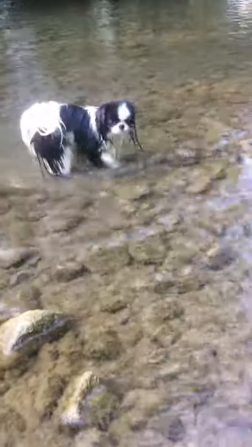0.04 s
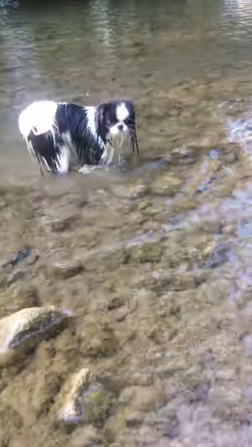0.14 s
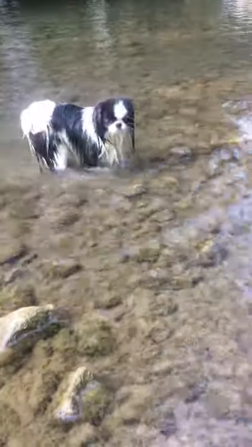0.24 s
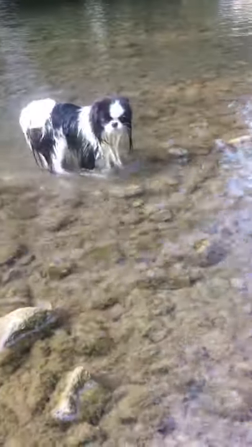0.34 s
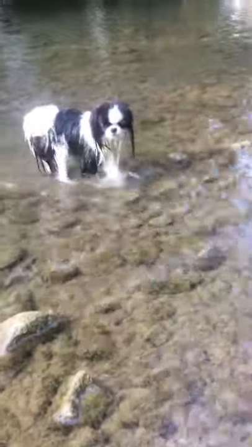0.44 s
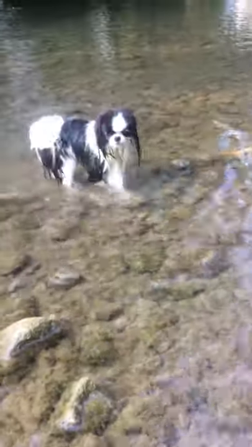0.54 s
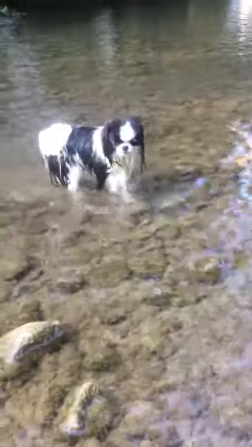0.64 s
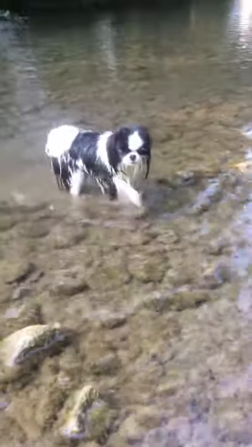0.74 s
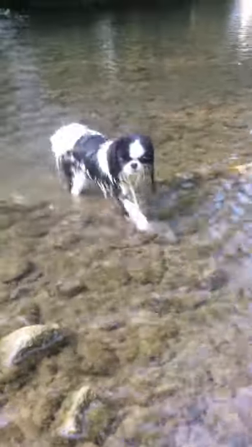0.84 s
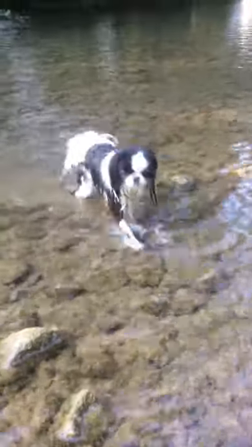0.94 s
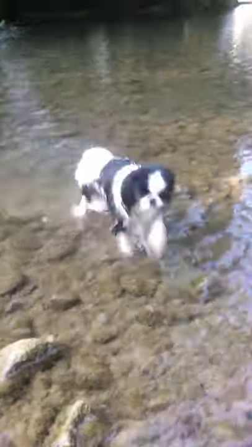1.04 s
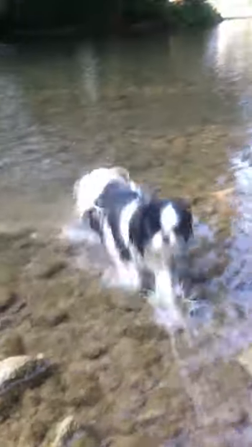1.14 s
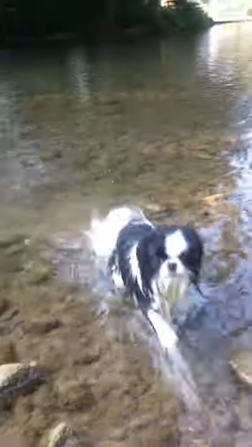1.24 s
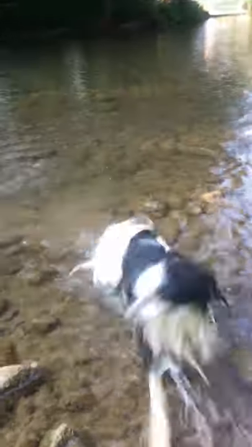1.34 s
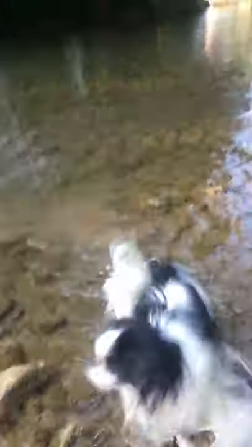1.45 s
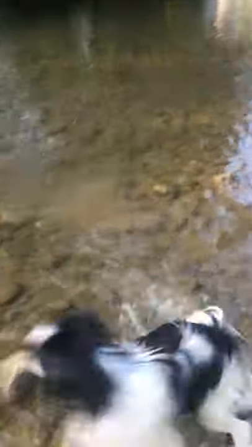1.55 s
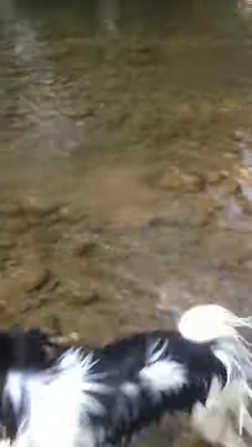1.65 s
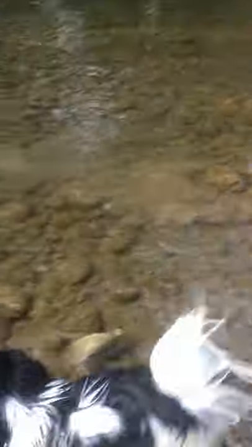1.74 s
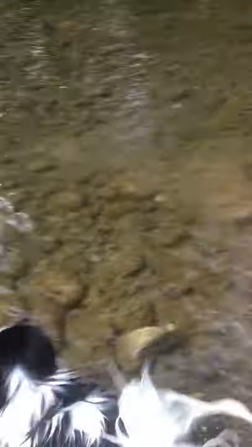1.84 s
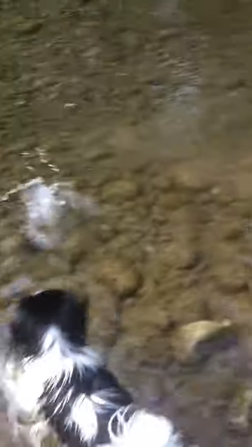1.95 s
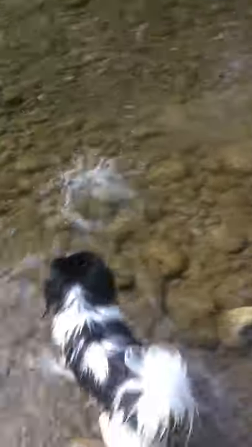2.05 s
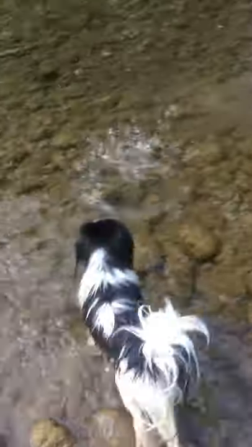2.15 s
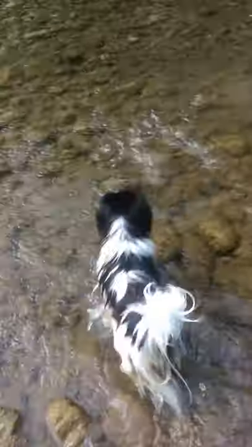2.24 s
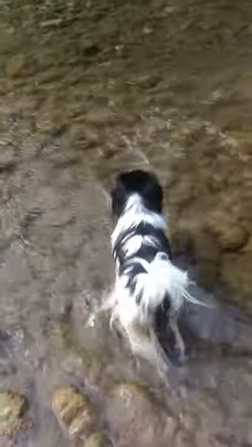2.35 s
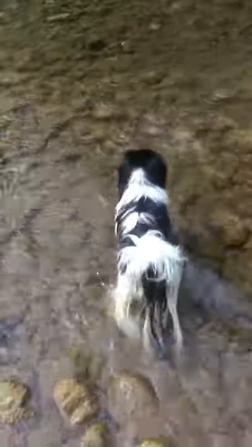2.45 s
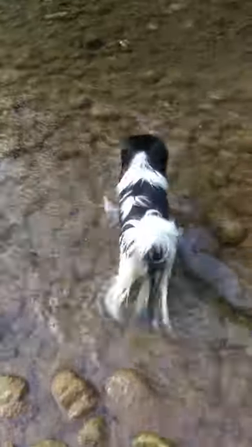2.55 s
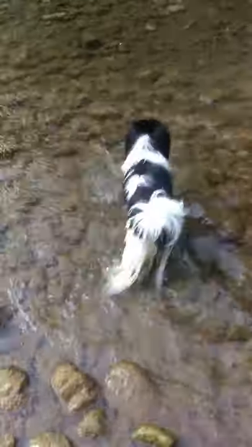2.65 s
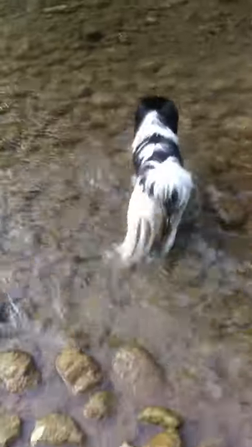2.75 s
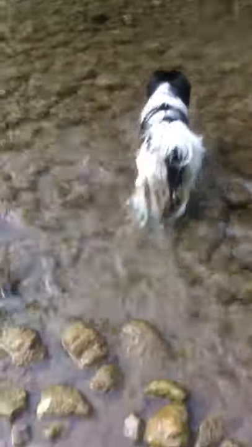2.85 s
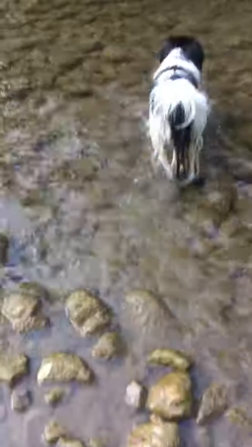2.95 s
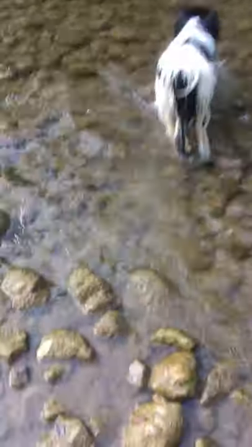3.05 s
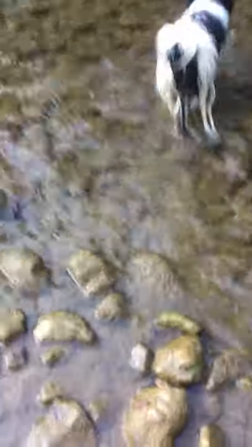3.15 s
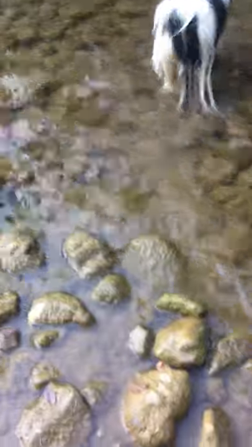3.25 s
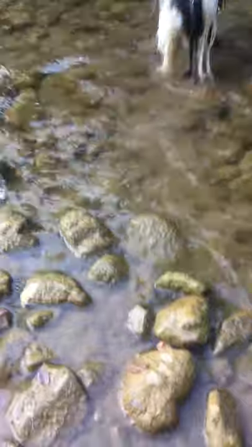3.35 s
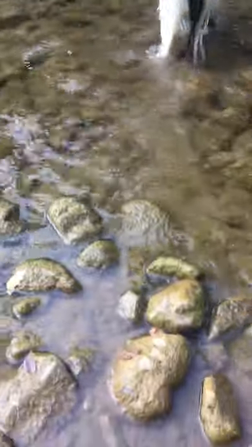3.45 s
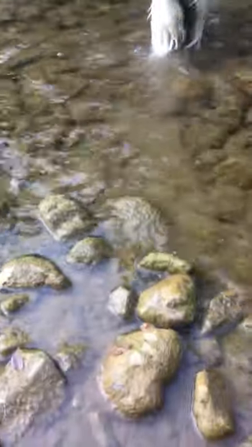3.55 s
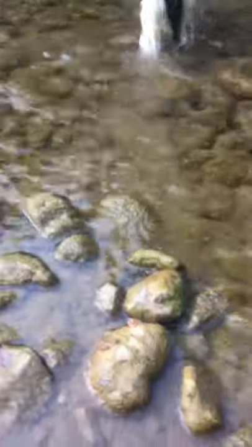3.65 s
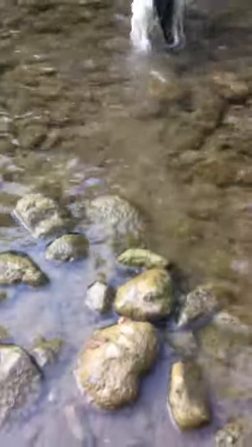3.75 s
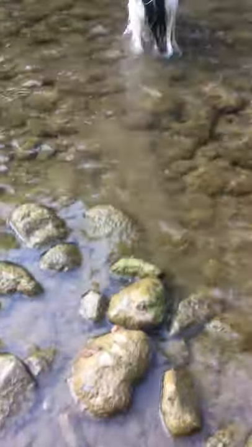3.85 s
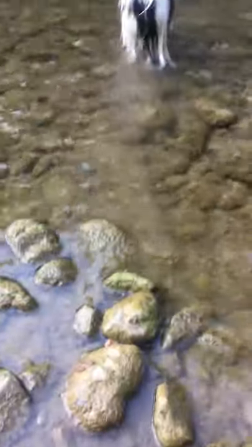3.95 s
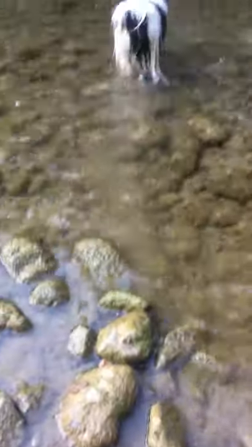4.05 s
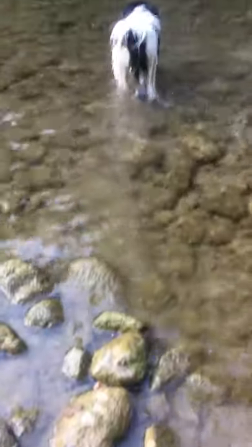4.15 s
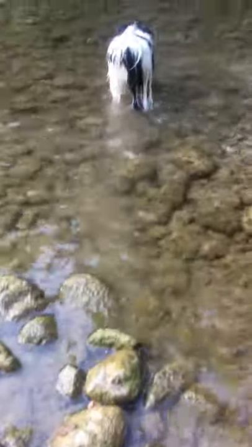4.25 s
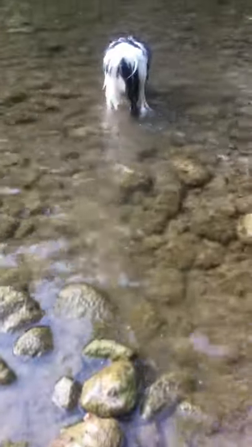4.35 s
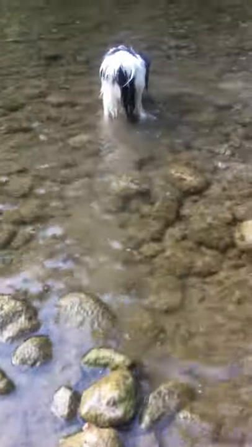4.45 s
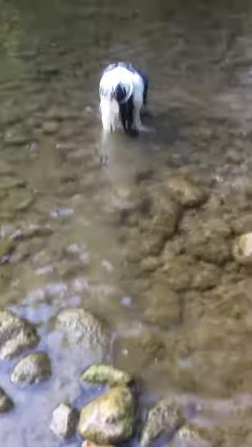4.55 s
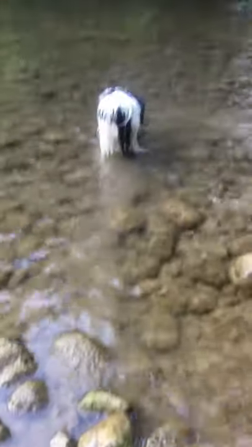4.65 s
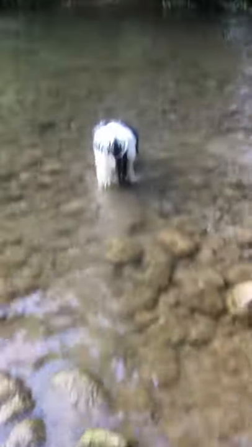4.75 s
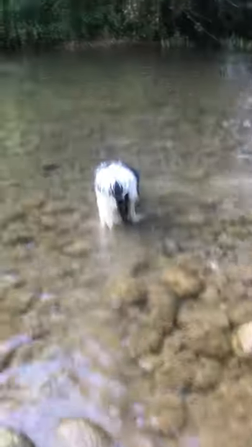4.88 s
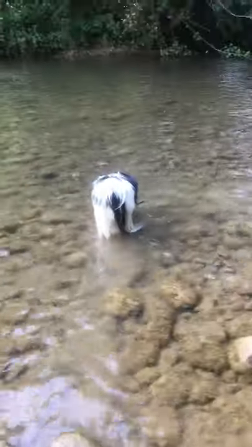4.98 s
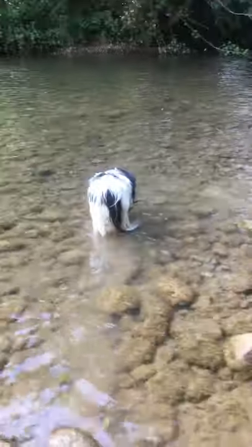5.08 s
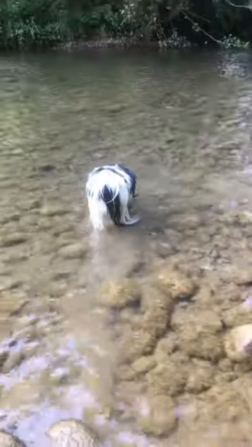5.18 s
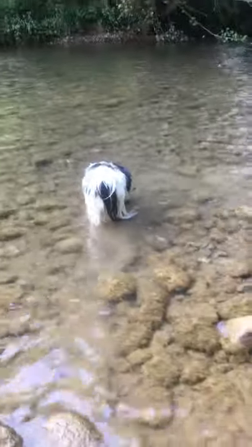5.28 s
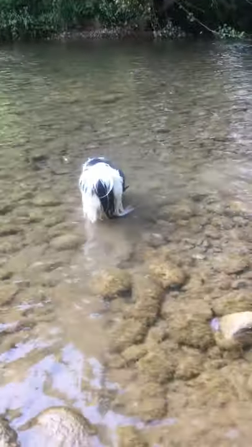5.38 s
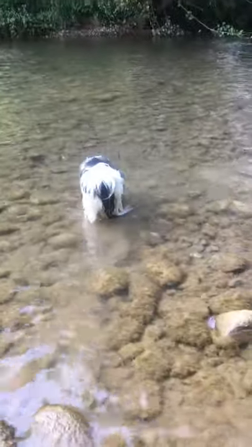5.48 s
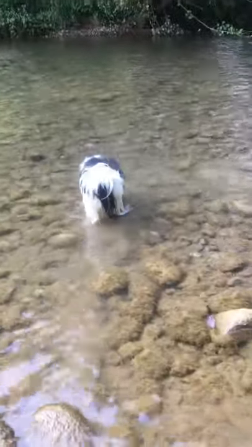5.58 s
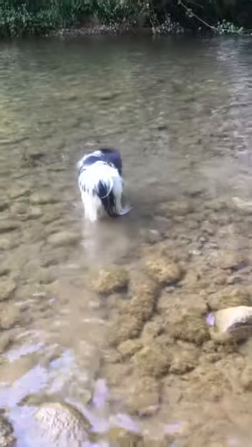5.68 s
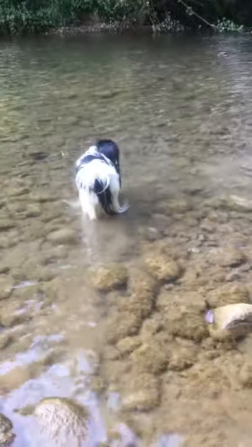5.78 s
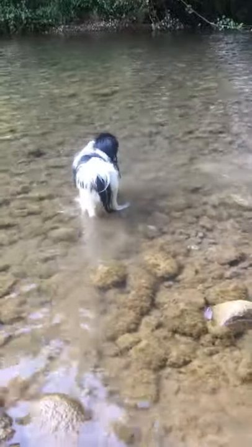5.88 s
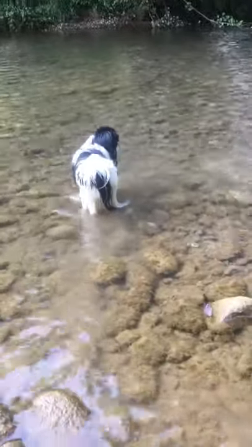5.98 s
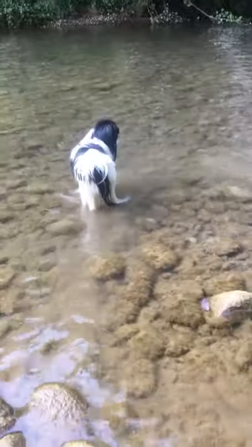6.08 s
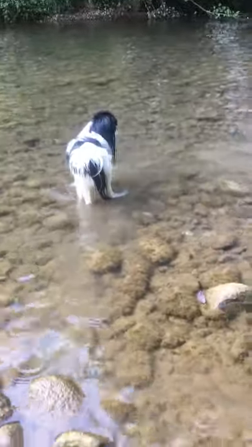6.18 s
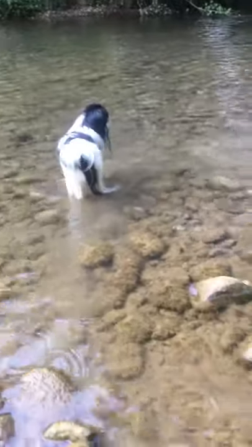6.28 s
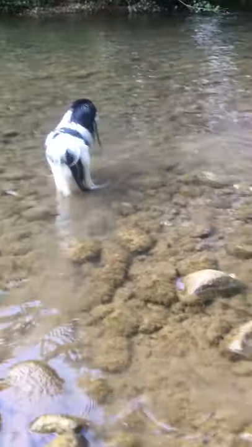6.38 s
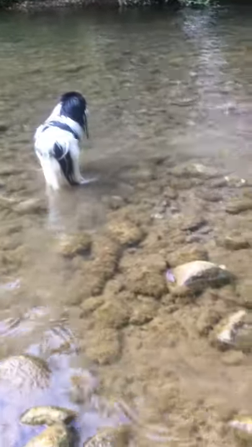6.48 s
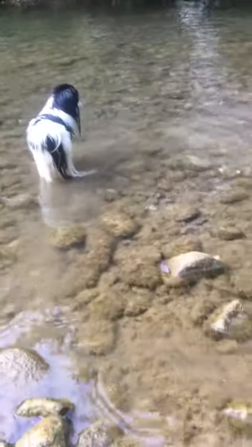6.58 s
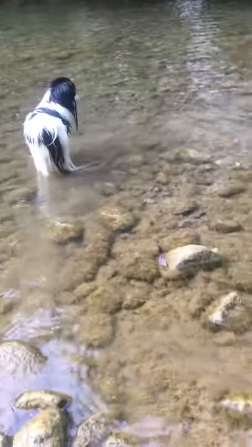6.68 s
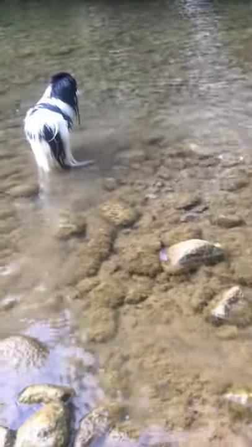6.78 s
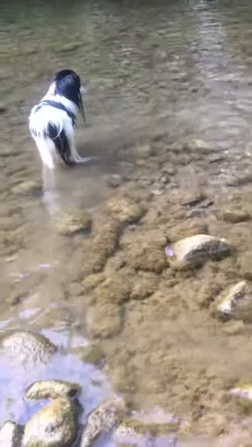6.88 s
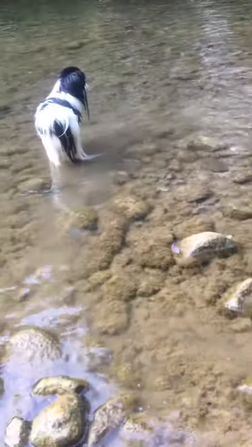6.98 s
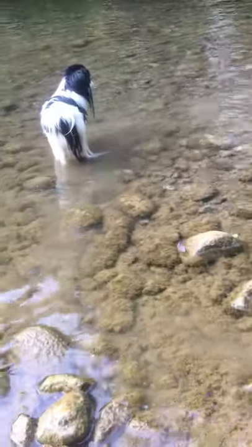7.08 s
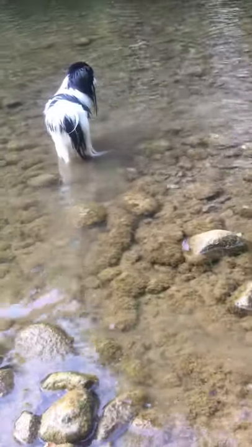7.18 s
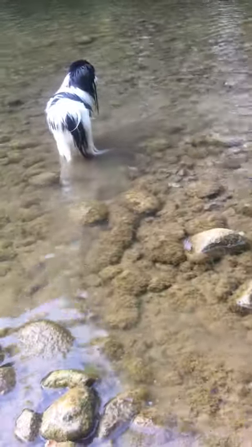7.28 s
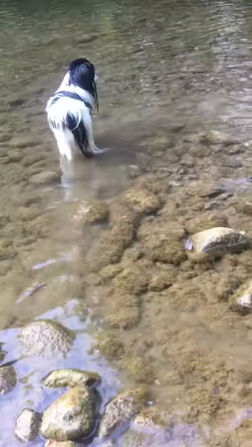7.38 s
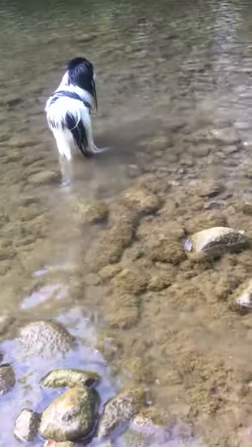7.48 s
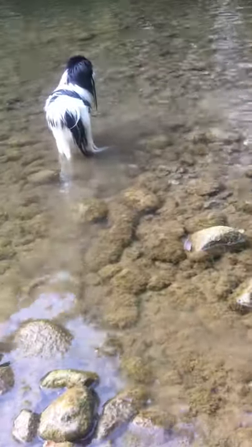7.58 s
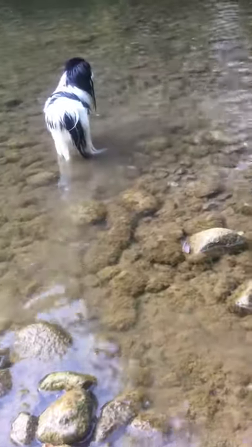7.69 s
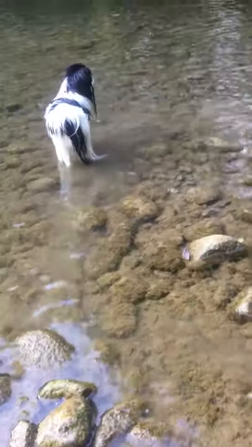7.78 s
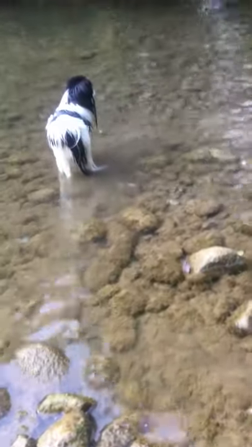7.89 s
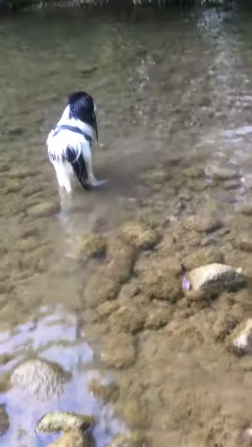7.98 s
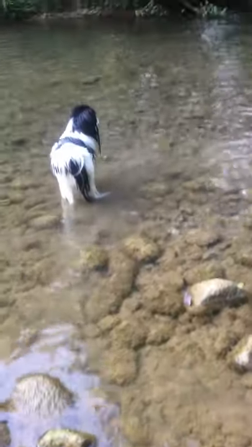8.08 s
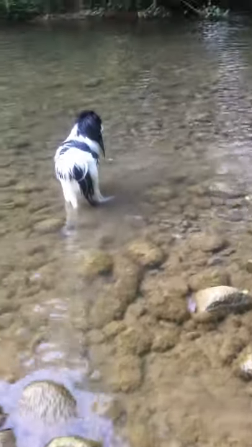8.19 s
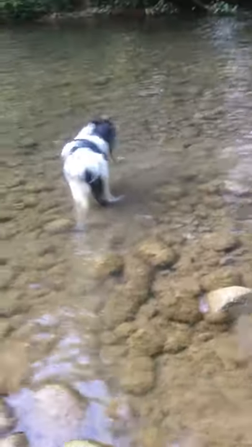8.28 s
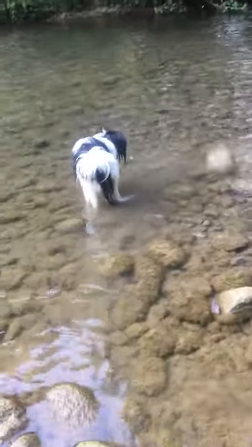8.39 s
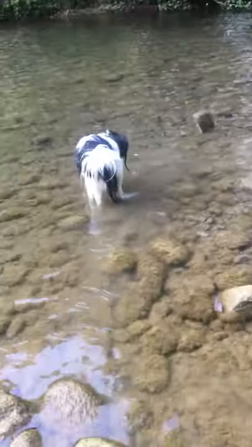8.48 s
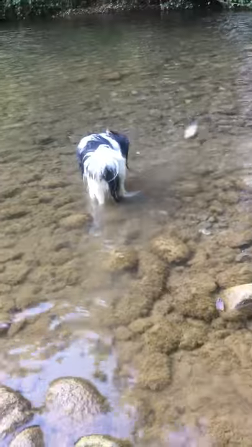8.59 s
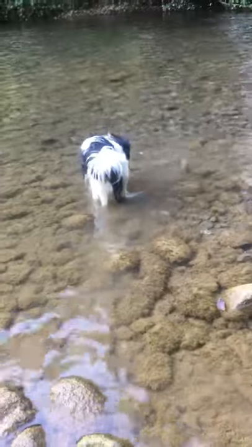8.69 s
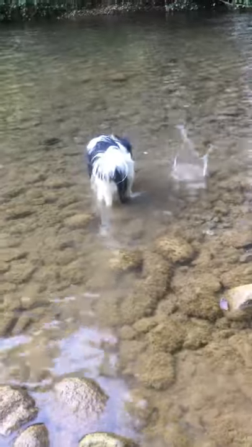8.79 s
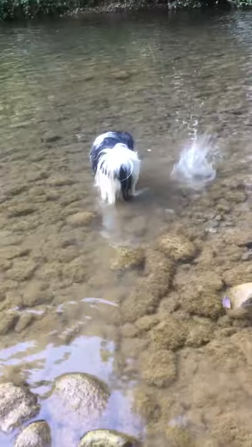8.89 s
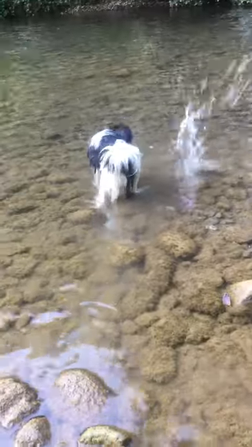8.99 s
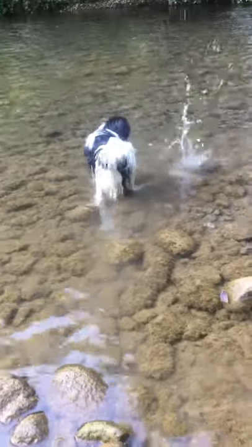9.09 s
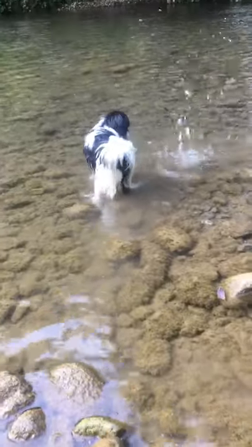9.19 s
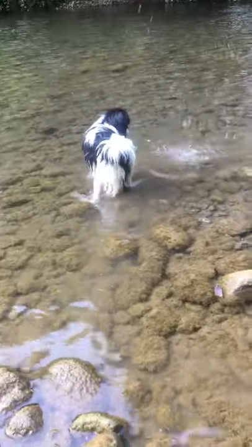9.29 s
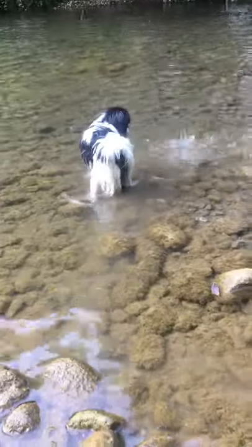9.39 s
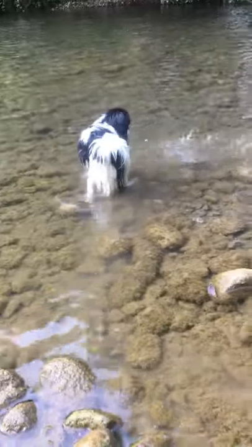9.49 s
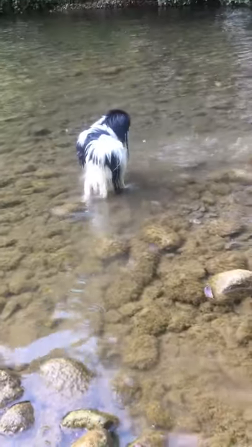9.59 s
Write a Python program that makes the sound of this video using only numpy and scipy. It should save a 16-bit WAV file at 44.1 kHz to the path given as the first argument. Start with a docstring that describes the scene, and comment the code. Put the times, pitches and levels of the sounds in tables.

```python
"""A small dog wades through a shallow stony river, and thrown stones plop into the water.
Paws and stones slap the surface, trap air that rings as bubbles, and throw spray that patters down.
Behind them the river murmurs, hisses and laps at the stones, something rumbles far off,
and a bird whistles among the trees on the bank."""
import sys
import numpy as np
from scipy import signal
from scipy.fft import rfft, irfft, next_fast_len
from scipy.io import wavfile
from scipy.ndimage import map_coordinates

SR = 44100
rng = np.random.default_rng(int(sys.argv[2]) if len(sys.argv) > 2 else 0)


def master_out(mix):
    """Clip the mix to full scale and print it as 16-bit PCM to the path in sys.argv[1]."""
    frames = np.transpose(np.atleast_2d(mix))
    ceiling = np.clip(frames, -1, 1)
    pcm = np.round(ceiling * 32767).astype(np.int16)
    wavfile.write(sys.argv[1], SR, pcm)


N = 424683
BURST_SAMPLES = 2048

# How loud the low background is: time_s, rumble_db, murmur_db
LOW_LEVELS = [(0, -59.5, -52.5), (.4, -53.5, -54.5), (1.2, -58, -54), (2.3, -55, -53.5),
              (3.1, -53.5, -53.5), (4.2, -58.5, -55.5), (5.2, -59.5, -55.5), (5.7, -54.5, -51),
              (6.4, -55.5, -53.5), (7.4, -54, -52.5), (7.75, -48.5, -51.5), (8.1, -53, -53),
              (8.7, -55.5, -53), (9.63, -54.5, -51.5)]
# How loud the flowing water is: time_s, hiss_db, lapping_db
FLOW_LEVELS = [(0, -57, -63), (1, -56, -60), (4, -57, -60), (4.5, -58, -66), (5.5, -58, -68),
               (5.72, -56, -55.5), (6.1, -57, -61), (6.95, -56, -62), (7.3, -57, -58), (7.6, -58, -65),
               (8.6, -57, -57), (8.75, -58, -64), (9.63, -57, -60)]


def amp(db):
    """Turn decibels into a gain."""
    return 10 ** (np.asarray(db) / 20)


def unit(x):
    """Scale x to an average (rms) level of 1."""
    return x / np.sqrt(np.mean(x ** 2) + 1e-20)


def curves(rows):
    """Join a table's points with lines: one curve for each column after the time."""
    time_s, *columns = np.transpose(rows)
    return [np.interp(np.arange(N) / SR, time_s, column) for column in columns]


def wobble(rate):
    """A smooth curve through `rate` random points a second."""
    return map_coordinates(rng.standard_normal(int(N * rate / SR) + 4), [np.arange(N) * rate / SR])


def filtered(x, response):
    """Filter x; response(hz) says how each frequency comes through."""
    size = next_fast_len(2 * len(x) if len(x) < SR else len(x) + 4096)
    return irfft(rfft(x, size) * response(np.fft.rfftfreq(size, 1 / SR)), size)[:len(x)]


def coloured(x, spectrum):
    """Shape the tone of x with (frequency_hz, level_db) points, then scale to level 1."""
    points_hz, db = np.transpose(spectrum)
    return unit(filtered(x, lambda hz: amp(np.interp(np.log(hz + 1), np.log(points_hz), db))))


def resonance(hz, centre_hz, width_hz):
    """A filter that passes its centre frequency and weakens those on either side."""
    return 1j * hz * width_hz / (centre_hz ** 2 - hz ** 2 + 1j * hz * width_hz + 1e-9)


def burst(db, fade_s, response):
    """A filtered puff of noise that peaks at db; the noise falls 60 dB in fade_s."""
    t = np.arange(BURST_SAMPLES) / SR
    noise = rng.standard_normal(BURST_SAMPLES)
    noise[2] += 4.5  # the first contact is a sharp push
    puff = filtered(noise * amp(-60 * t / fade_s), response)
    return amp(db) * puff / np.abs(puff).max()


def ringing(start_s, db, hz, life_s, rise, hold, size):
    """Bubbles ring higher as they near the surface: in life_s, 9 dB down and `rise` times the pitch."""
    t = np.arange(size) / SR
    db, hz, life_s, rise, hold = (np.reshape(x, (-1, 1)) for x in (db, hz, life_s, rise, hold))
    phase = 2 * np.pi * hz * (t + (rise - 1) * life_s / 2 * np.minimum(t / life_s, 4.5) ** 2)
    attack = 1 - np.exp(-t * hz * 1.5)
    fade = amp(db - 9 * (t / life_s) ** hold)  # hold 1 fades at once; 5 lingers, then stops
    positions = (start_s * SR).astype(int)[:, None] + np.arange(size)
    return np.bincount(positions.ravel(), (attack * fade * np.sin(phase)).ravel(), N + size)[:N]


def swarm(count, hz, spread, cycles, scatter_db, size):
    """A random crowd of small bubbles or drops, each `size` samples long."""
    start_s = rng.random(count) * N / SR
    pitch_dice, life_dice, level_dice = rng.standard_normal((count, 3)).T
    pitch_hz = np.clip(hz * np.exp(spread * pitch_dice), 100, SR / 2.6)
    life_s = np.minimum(cycles * np.exp(.4 * life_dice) / pitch_hz, size / SR / 3)
    db = scatter_db * np.clip(level_dice, -2, 2)
    return unit(ringing(start_s, db, pitch_hz, life_s, rise=1.1 + .08 * life_dice, hold=1.6, size=size))


def echo(x, fade_s, size):
    """Many reflections blur into a tail that falls 60 dB in fade_s."""
    tail = rng.standard_normal(size) * amp(-60 * np.arange(size) / SR / fade_s)
    return signal.fftconvolve(x, tail / np.linalg.norm(tail))[:N]


def far_rumble():
    """Deep noise from far off slowly swells and sinks."""
    # The rumble's tone: frequency_hz, level_db
    tone = [(20, -30), (33, -8), (45, 0), (62, 1), (85, -5), (130, -12), (180, -38), (310, -99)]
    level_db, _ = curves(LOW_LEVELS)
    return amp(level_db + .8 * wobble(3)) * coloured(rng.standard_normal(N), tone)


def river():
    """The river gives a hollow murmur and a fine hiss, and small waves lap at the stones."""
    # The tone of each of the three: frequency_hz, level_db
    murmur_tone = [(71, -30), (120, -5), (180, -4), (245, -5), (300, 1.5), (360, -4), (430, -8), (521, -10),
                   (620, -19), (910, -40), (1540, -120)]
    hiss_tone = [(300, -40), (650, -11), (1060, -9), (1400, -10), (1810, -11), (2430, -11), (2890, -18),
                 (4030, -19), (5940, -23), (7650, -28), (11000, -31), (15700, -33)]
    lapping_tone = [(330, -50), (520, -6), (670, 0), (800, -7), (1100, -12), (2000, -40), (6000, -120)]
    _, murmur_db = curves(LOW_LEVELS)
    hiss_db, lapping_db = curves(FLOW_LEVELS)
    murmur = amp(murmur_db + 1.2 * wobble(7)) * coloured(rng.standard_normal(N), murmur_tone)
    trickle = rng.standard_normal(N)
    trickle += .2 * swarm(count=500, hz=10000, spread=.22, cycles=2.5, scatter_db=4, size=80)
    waves = rng.standard_normal(N)
    waves += .1 * swarm(count=500, hz=800, spread=.35, cycles=5, scatter_db=3, size=800)
    hiss = amp(hiss_db + .7 * wobble(6)) * coloured(trickle, hiss_tone)
    lapping = amp(lapping_db + 1.8 * wobble(12)) * coloured(waves, lapping_tone)
    return murmur + hiss + lapping


def bird():
    """Short falling whistles, heard mostly as their echo among the trees."""
    # The notes: start_s, length_s, start_hz, end_hz, level_db
    notes = [(3.366, .012, 6950, 6250, -40), (4.41, .085, 7900, 6400, -63.5), (4.575, .05, 5700, 4950, -68),
             (4.615, .035, 4700, 4300, -64.5), (4.735, .055, 5300, 4650, -66.5),
             (4.775, .035, 4400, 4100, -68), (4.885, .04, 5300, 4800, -68), (4.925, .035, 4600, 4050, -66)]
    song = np.zeros(N)
    for start_s, length_s, start_hz, end_hz, db in notes:
        progress = np.linspace(0, 1, round(length_s * SR), endpoint=False)
        pitch_hz = end_hz + (start_hz - end_hz) * (1 - progress) ** 1.6
        note = np.sin(2 * np.pi * np.cumsum(pitch_hz) / SR) * np.sin(np.pi * progress ** 1.5)
        song[round(start_s * SR):][:len(note)] += amp(db) * note
    return amp(-3) * song + amp(6.5) * echo(song, fade_s=.85, size=SR)


def soft_hisses():
    """Brief swells of hiss in evenly spaced frequency bands."""
    # The swells: start_s, peak_s, end_s, level_db
    swells = [(.07, .15, .23, -51), (6.91, 6.94, 6.99, -58), (8.24, 8.27, 8.32, -64)]
    # The bands: centre_hz, width_hz, level_db
    bands = [(2600, 700, -6), (5600, 700, 0), (8700, 700, 2), (12000, 1200, -2), (14800, 1200, -2)]
    t = np.arange(N) / SR
    gain = sum(amp(db) * np.interp(t, times_s, [0, 1, 0]) for *times_s, db in swells)
    tone = lambda f: sum((-1) ** k * amp(db) * resonance(f, hz, width_hz)
                         for k, (hz, width_hz, db) in enumerate(bands))
    return gain * unit(filtered(rng.standard_normal(N), tone))


def spurt():
    """A smooth hiss starts suddenly and fades, its treble first."""
    # The spurt's tone: frequency_hz, level_db
    tone = [(900, -40), (2000, -6), (3000, -3), (4500, -4), (5600, -4), (6400, 1.5), (7300, -4),
            (10000, -9), (15600, -14)]
    start_s, level_db, fall_s = 3.3675, -36, .16
    t = np.arange(N) / SR - start_s
    hiss = coloured(rng.standard_normal(N), tone)
    treble = filtered(hiss, lambda hz: 1 / (1 + (8000 / (hz + 1)) ** 6))
    fade = lambda seconds: (t > 0) * amp(level_db - 20 * np.abs(t) / seconds)
    return fade(fall_s) * (hiss - treble) + fade(fall_s / 2.2) * treble


def stirring():
    """The gains of gurgle and spray: sloshes jump up and die away on top of steady stirring."""
    # How hard the dog and the ripples stir the water: time_s, level_db
    steady = [(0, -72), (.2, -60), (.35, -68), (.82, -68), (.88, -55), (1.08, -47), (1.3, -41), (1.75, -39),
              (2.2, -47), (2.45, -52), (2.7, -47), (2.85, -53), (3.05, -48), (3.2, -58), (3.7, -58.5),
              (4.15, -64), (4.4, -85), (8.7, -85), (8.9, -53), (9.15, -60), (9.63, -64)]
    # Thrown water: start_s, gurgle_db, spray_db, fall_s (for the gurgle to drop 20 dB)
    sloshes = [(.24, -52, -59, .08), (.29, -46, -58, .06), (.505, -52, -58, .1), (.533, -48, -53, .2),
               (.582, -49, -48, .12), (1.085, -39, -42, .07), (1.115, -43, -58, .25), (1.21, -36, -36, .4),
               (1.33, -41, -39, .1), (1.36, -37, -38, .17), (1.458, -38, -36, .25), (1.53, -37, -35, .15),
               (1.585, -34, -32, .3), (1.8, -36, -38, .08), (1.9, -40, -39, .35), (1.975, -41, -40, .1),
               (2.012, -41, -40, .07), (2.072, -40, -40, .35), (2.238, -40, -37, .22),
               (2.432, -41, -47, .04), (2.458, -45, -47, .1), (2.527, -39, -47, .11),
               (2.675, -45, -48, .22), (2.912, -45, -51, .45), (3.128, -42, -54, .05),
               (3.32, -44, -56, .15), (3.368, -42, -50, .2), (3.418, -39, -50, .2), (3.75, -50, -61, .15),
               (3.874, -43, -57, .1), (3.945, -46, -60, .13), (5.47, -60, -47, .06),
               (5.573, -41, -33, .045), (5.64, -60, -63, 1.2), (8.803, -54, -53, .15),
               (8.846, -44, -41, .035), (8.918, -46, -52, .05), (8.935, -39, -36, .045),
               (8.985, -45, -57, .08), (9.045, -50, -54, .05), (9.245, -51, -59, .25),
               (9.342, -51, -56, .05)]
    start_s, gurgle_db, spray_db, fall_s = np.transpose(sloshes)[:, :, None]
    t = np.arange(0, N / SR + .002, .001)
    steady_db = np.interp(t, *np.transpose(steady))
    age_s, rise_s = t - start_s, .008

    def gain(base_db, peak_db, fade_s):
        shape_db = -20 * np.where(age_s < 0, -age_s / rise_s, np.abs(age_s / fade_s) ** 1.4)
        power = amp(2 * base_db) + amp(2 * (peak_db + shape_db)).sum(axis=0)
        return np.interp(np.arange(N) / SR, t, np.sqrt(power))

    return gain(steady_db, gurgle_db, fall_s), gain(steady_db - 5.5, spray_db, .75 * fall_s)


def churn():
    """Stirred water gurgles with small bubbles and throws drops; both come in the same clumps."""
    # The tone of each: frequency_hz, level_db
    gurgle_tone = [(120, -60), (260, -20), (450, -16), (650, -5), (1160, -1), (1400, -4), (2180, -3),
                   (2900, -6), (4000, -10), (6000, -32), (9900, -120)]
    spray_tone = [(2060, -32), (3500, -2), (3940, 0), (5060, -5), (5460, -2), (7840, -6), (9340, -4),
                  (10300, -8), (12000, -4), (15600, -10)]
    gurgle_gain, spray_gain = stirring()
    clumps = wobble(45)
    bubbles = 1.15 * rng.standard_normal(N)
    bubbles += swarm(count=7500, hz=2100, spread=.6, cycles=8, scatter_db=4.2, size=500)
    drops = 1.1 * rng.standard_normal(N)
    drops += swarm(count=11000, hz=9500, spread=.55, cycles=4.5, scatter_db=4.6, size=110)
    gurgle = unit(amp(1.5 * clumps) * coloured(bubbles, gurgle_tone))
    spray = unit(amp(1.2 * clumps + 2.8 * wobble(40)) * coloured(drops, spray_tone))
    return amp(-.7) * gurgle_gain * gurgle + amp(1.3) * spray_gain * spray


def drips():
    """Single drops hit the surface, each with a tiny tick around its own pitch."""
    # The drops: start_s, peak_db, pitch_hz
    drops = [(0.2079, -41, 5580), (0.2783, -34, 4700), (0.4364, -39, 8930), (0.5536, -35, 5740),
             (0.5876, -25, 4680), (0.8724, -36, 5990), (0.8999, -32, 5670), (0.9443, -39, 9400),
             (1.0785, -30, 12500), (1.1005, -26, 10500), (1.78, -20, 9500), (1.846, -17, 8500),
             (2.693, -31, 8200), (2.701, -32, 3600), (2.754, -31, 6100), (2.785, -36, 6000),
             (2.891, -36, 7500), (2.915, -33, 3300), (2.937, -31, 4800), (2.985, -34, 6000),
             (3.2329, -33, 12200), (3.254, -39, 5120), (3.8048, -33, 5180), (3.69, -38, 11500),
             (3.888, -35, 12200), (4.2896, -39, 11900), (4.3326, -44, 13300), (5.3433, -33, 10900),
             (5.4021, -39, 5950), (5.6094, -39, 3600), (5.6745, -42, 5900), (5.696, -39, 7000),
             (5.9973, -41, 8790), (6.0252, -42, 4530), (6.94, -35, 5930), (8.979, -37, 7290),
             (9.0124, -36, 7170), (9.0274, -35, 5400), (9.201, -38, 6490), (9.2474, -34, 6910),
             (9.3561, -33, 5880), (9.433, -30, 6390)]
    out = np.zeros(N + BURST_SAMPLES)
    for start_s, db, hz in drops:
        tone = lambda f: resonance(f, hz, .4 * hz) * resonance(f, 1.1 * hz, 1.5 * hz)
        out[round(start_s * SR):][:BURST_SAMPLES] += burst(db, .015, tone)
    return out[:N]


def trapped_air():
    """Pockets of air ring under water, and their level flutters as the surface moves."""
    # Bubbles that stay near one pitch: start_s, level_db, pitch_hz, life_s
    bubbles = [(.012, -30, 300, .011), (.033, -29, 180, .01), (.292, -32, 950, .01),
               (.532, -31, 1300, .005), (.582, -33, 320, .008), (.598, -34, 3200, .004),
               (.617, -36, 2800, .005), (1.083, -29, 1240, .006), (1.089, -30, 700, .014),
               (1.05, -36, 650, .012), (1.0, -36, 1400, .006), (.958, -38, 1050, .006),
               (1.27, -31, 1050, .008), (1.328, -28, 2100, .005), (1.347, -29, 670, .009),
               (1.382, -28, 1150, .012), (1.432, -33, 1150, .007), (1.207, -26, 2490, .008),
               (1.382, -28, 1580, .014), (1.534, -26, 1280, .005), (1.582, -23, 1090, .014),
               (1.587, -17, 930, .006), (1.607, -19, 810, .009), (1.642, -27, 1590, .009),
               (1.698, -27, 1450, .005), (1.804, -20, 1180, .012), (1.841, -20, 1710, .005),
               (1.843, -28, 670, .015), (1.991, -24, 1060, .006), (2.088, -25, 2440, .005),
               (2.09, -30, 1750, .006), (2.24, -21, 1020, .009), (2.273, -21, 810, .005),
               (2.534, -25, 780, .007), (2.593, -35, 1010, .008), (2.612, -37, 1030, .02),
               (2.648, -33, 1100, .005), (2.886, -38, 2040, .01), (2.924, -30, 1140, .005),
               (2.972, -36, 960, .012), (3.012, -32, 1580, .004), (3.186, -37, 960, .004),
               (2.786, -34, 920, .017), (3.125, -37, 640, .016), (3.145, -33, 360, .012),
               (3.068, -34, 640, .004), (3.069, -31, 180, .006), (3.126, -25, 1130, .003),
               (3.138, -19, 1030, .007), (3.37, -28, 2450, .005), (3.327, -33, 1750, .008),
               (3.414, -27, 850, .017), (3.49, -27, 620, .005), (3.53, -33, 1750, .007),
               (3.466, -26, 1070, .013), (3.877, -37, 550, .02), (3.877, -33, 1150, .005),
               (3.895, -36, 1000, .012), (3.932, -37, 1300, .008), (3.893, -29, 1910, .004),
               (3.948, -33, 1250, .003), (3.914, -24, 1400, .005), (3.964, -26, 2450, .004),
               (4.238, -30, 1360, .009), (4.238, -29, 1000, .006), (5.567, -19, 680, .005),
               (5.607, -38, 1750, .004), (5.855, -46, 950, .006), (6.915, -41, 1600, .008),
               (7.548, -45, 850, .003), (8.846, -18, 1450, .004), (8.847, -21, 3700, .003),
               (8.855, -39, 2550, .012), (8.92, -33, 3500, .004), (8.929, -33, 4400, .003),
               (8.847, -19, 640, .006), (8.897, -32, 1660, .004), (8.921, -35, 640, .008),
               (8.936, -19, 700, .005), (8.937, -18, 1250, .004), (8.988, -32, 1330, .005),
               (9.05, -36, 2450, .007), (9.268, -38, 900, .008), (9.29, -36, 1250, .006),
               (9.313, -34, 2900, .005), (9.345, -36, 2850, .006), (9.357, -37, 1200, .005)]
    # Gulps that sweep up as they surface: start_s, level_db, pitch_hz, life_s, rise, hold
    gulps = [(.241, -34, 1050, .005, 1.47, 1.6), (.63, -40, 480, .05, 2.2, 5),
             (1.098, -23, 1040, .007, 1.4, 1.6), (2.489, -38, 430, .024, 2.5, 6),
             (2.535, -32, 340, .025, 2.2, 6), (2.727, -26, 950, .007, 1.35, 1.3),
             (3.318, -33, 720, .016, 1.47, 1.8), (3.508, -34, 620, .028, 3.1, 4),
             (3.735, -42, 720, .045, 1.47, 1.8), (3.984, -36, 1600, .013, 1.2, 1.6),
             (9.04, -45, 420, .025, 1.5, 2.2), (9.436, -38, 2500, .005, 1.47, 1.6)]
    rings = ringing(*np.transpose(bubbles), rise=1.04, hold=1.4, size=4000)
    sweeps = ringing(*np.transpose(gulps), size=4000)
    return amp(3 * wobble(160)) * (rings + sweeps)


def plunks():
    """The deep hollow left by a stone or paw rings low and dies away smoothly."""
    # The hollows: start_s, level_db, pitch_hz, life_s
    hollows = [(.251, -33, 320, .006), (2.458, -15.5, 215, .024), (2.805, -25, 280, .006),
               (3.625, -27, 370, .005), (5.568, -19.5, 205, .016), (8.939, -21, 200, .011)]
    return ringing(*np.transpose(hollows), rise=1.1, hold=1, size=6000)


def slaps():
    """A paw or stone smacks the surface: a short burst with a fizz of torn water on top."""
    # The hits: start_s, body_db, pitch_hz, fizz_db
    hits = [(.2481, -28, 1600, -28), (.5317, -25, 1390, -35), (.5797, -27, 1510, -36),
            (.9737, -33, 2680, -15), (1.0181, -24, 2630, -39), (1.0825, -21, 1370, -32),
            (1.0946, -20, 1300, -17), (1.1114, -18, 2440, -32), (1.2056, -20, 1950, -22),
            (1.2131, -14, 2350, -19), (1.241, -17, 3230, -8), (1.3597, -18, 2330, -15),
            (1.4564, -9, 2650, -8), (1.5125, -21, 2710, -27), (1.5863, -10, 1920, -13),
            (1.6728, -18, 2260, -19), (1.7234, -22, 2970, -25), (1.7399, -5, 1920, -16),
            (1.768, -21, 2370, -8), (1.8022, -10, 1580, -21), (1.811, -13, 1320, -18),
            (1.8399, -7, 1900, -23), (1.8875, -22, 3130, -25), (1.9035, -25, 3000, -29),
            (1.9515, -20, 1760, -9), (1.991, -24, 3500, -25), (2.0139, -23, 2180, -15),
            (2.2207, -29, 3580, -23), (2.2385, -18, 1100, -26), (2.2419, -12, 1500, -18),
            (2.2734, -11, 1050, -28), (2.3931, -22, 3060, -25), (2.4572, -4, 1750, -22),
            (2.5314, -18, 3100, -26), (2.6755, -26, 1600, -34), (2.8026, -19, 1380, -34),
            (3.1475, -22, 1880, -20), (3.4226, -18, 1620, -32), (3.491, -19, 1420, -38),
            (3.4976, -25, 2220, -28), (3.618, -32, 3000, -34), (3.6225, -18, 2090, -24),
            (3.8751, -28, 1220, -47), (3.8937, -28, 1500, -40), (3.9647, -25, 2240, -46),
            (5.471, -36, 2940, -30), (5.5675, -18, 770, -22), (8.8454, -7, 3500, -6),
            (8.9194, -26, 1520, -38), (8.9306, -21, 2220, -31), (8.9375, -8, 1200, -18),
            (9.0555, -28, 2820, -33), (9.288, -27, 1550, -32), (9.3133, -28, 2920, -25)]
    fizz_tone = lambda f: resonance(f, 10000, 15000) * resonance(f, 8000, 13000)
    out = np.zeros(N + BURST_SAMPLES)
    for start_s, body_db, hz, fizz_db in hits:
        body_tone = lambda f: (resonance(f, hz, 1.1 * hz) ** 2 * resonance(f, .7 * hz, 2.5 * hz)
                               * resonance(f, 1.2 * hz, 4.2 * hz))
        fade_s = .017 * amp(-.3 * (body_db + 20))  # a harder slap is shorter
        slap = burst(body_db, fade_s, body_tone) + burst(fizz_db, .015, fizz_tone)
        out[round(start_s * SR):][:BURST_SAMPLES] += slap
    return out[:N]


def scene():
    """Mix everything to one channel; the stones and banks faintly echo the splashes."""
    splashes = slaps() + drips() + trapped_air() + plunks()
    delayed = np.pad(splashes, (200, 0))
    water = splashes + amp(-22) * echo(delayed, fade_s=.12, size=SR // 4) + churn()
    return (water + far_rumble() + river() + bird() + soft_hisses() + spurt())[None]


def record(dry):
    """The microphone loses the deepest bass and highest treble, and dips in one high band."""
    bottom_hz, dip_hz, top_hz = 33, 10500, 15900
    dip = lambda hz: 1 - .27 * resonance(hz, dip_hz, width_hz=600)
    band = lambda hz: (hz < top_hz) / (1 + (bottom_hz / (hz + 1)) ** 4)
    return filtered(dry[0], lambda hz: band(hz) * dip(hz))[None]


dry = scene()
out = record(dry)
master_out(out)
```